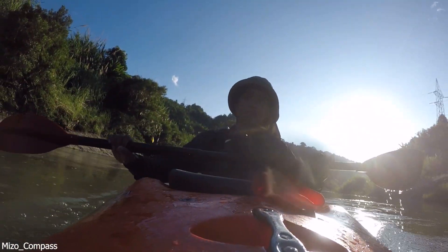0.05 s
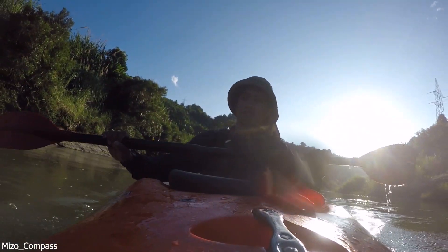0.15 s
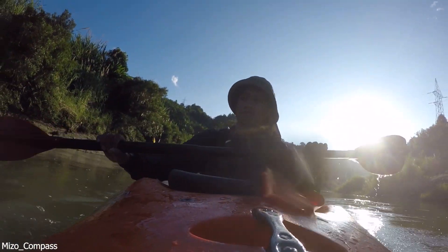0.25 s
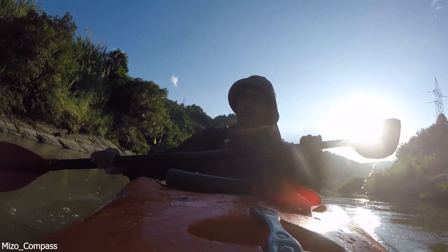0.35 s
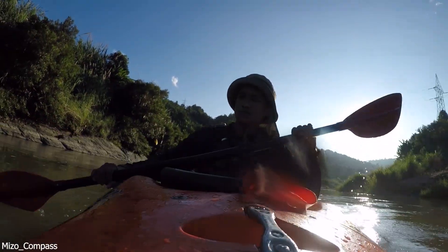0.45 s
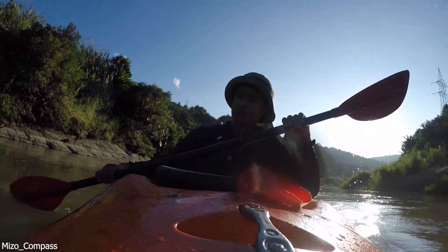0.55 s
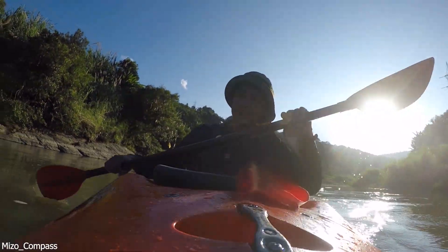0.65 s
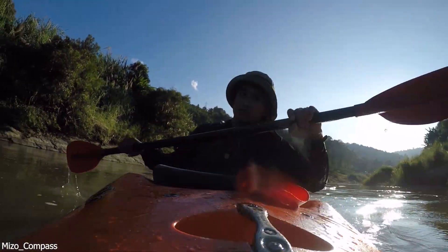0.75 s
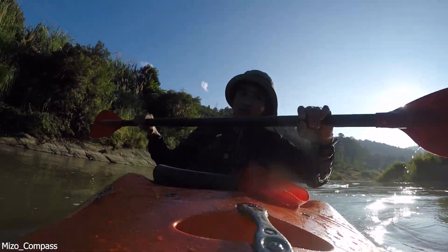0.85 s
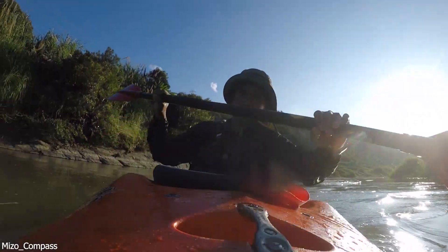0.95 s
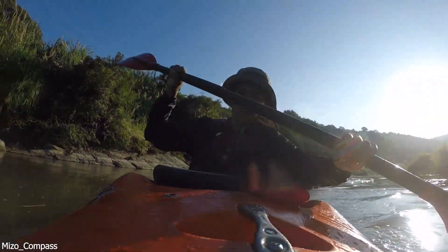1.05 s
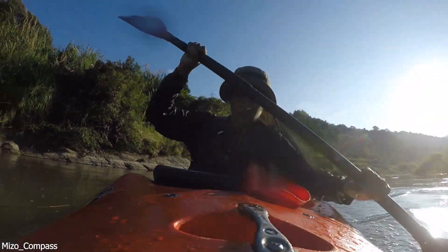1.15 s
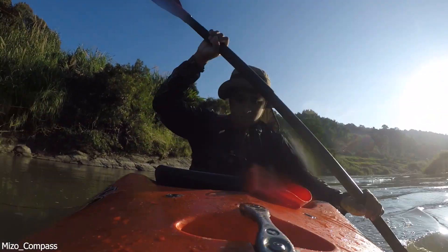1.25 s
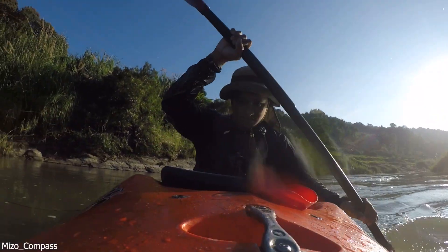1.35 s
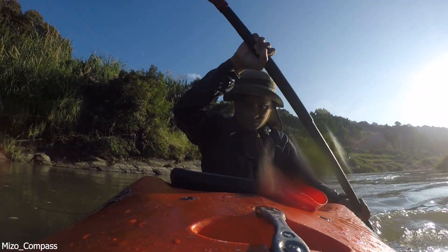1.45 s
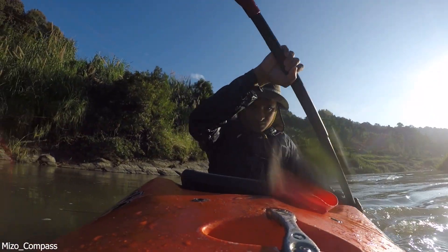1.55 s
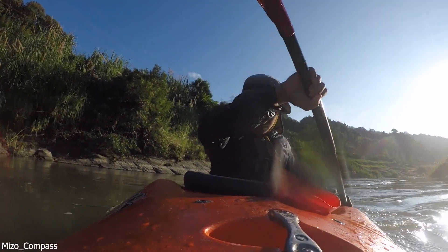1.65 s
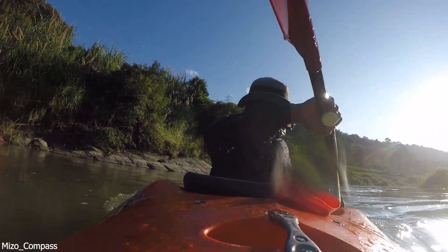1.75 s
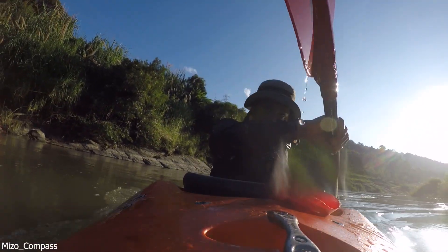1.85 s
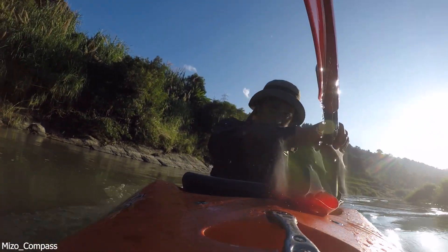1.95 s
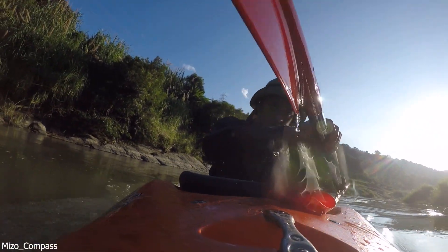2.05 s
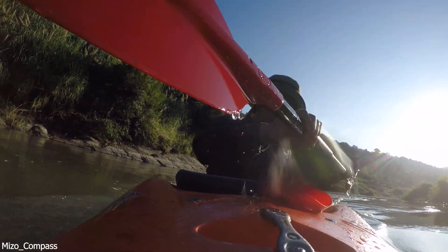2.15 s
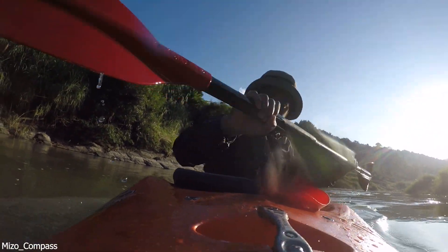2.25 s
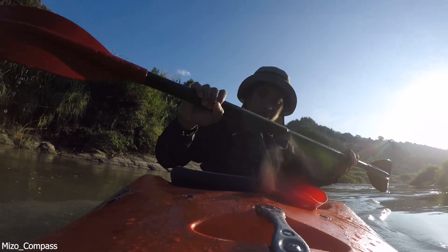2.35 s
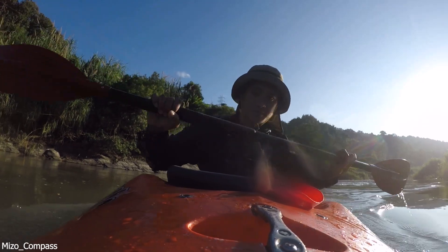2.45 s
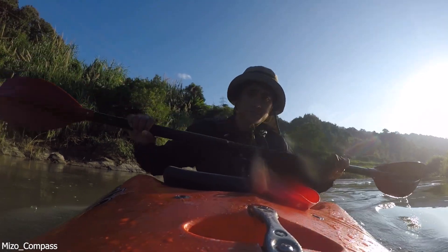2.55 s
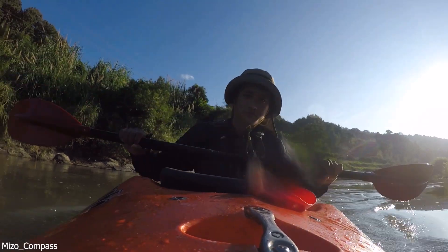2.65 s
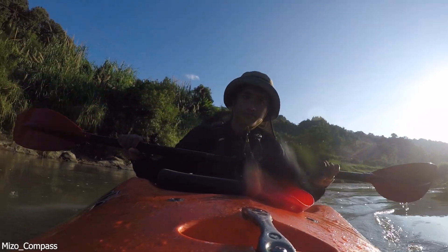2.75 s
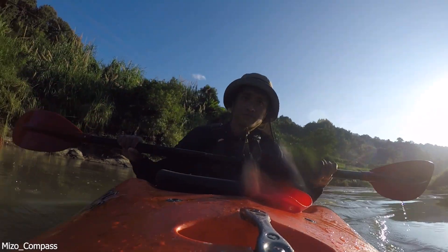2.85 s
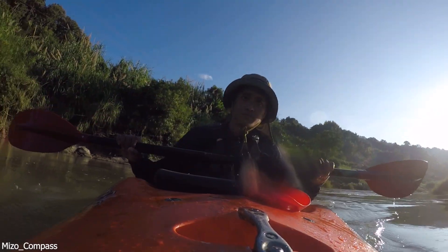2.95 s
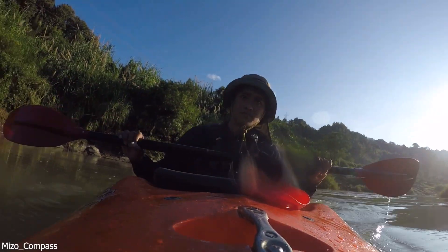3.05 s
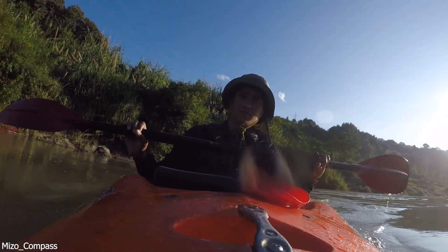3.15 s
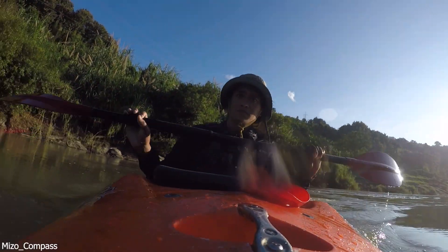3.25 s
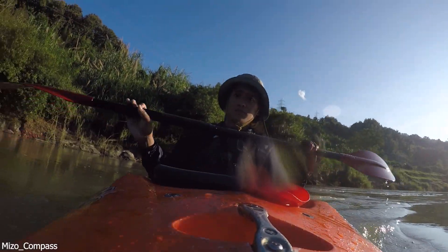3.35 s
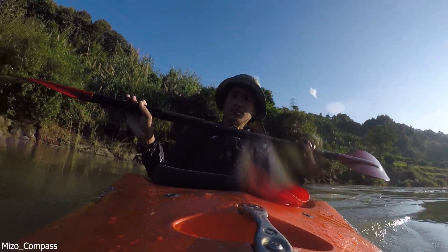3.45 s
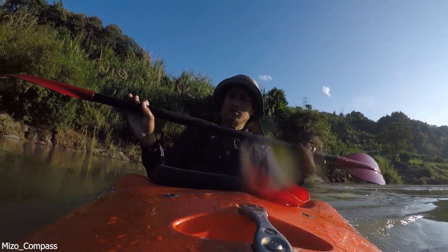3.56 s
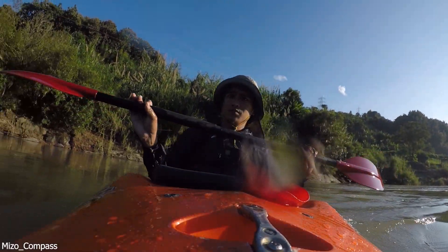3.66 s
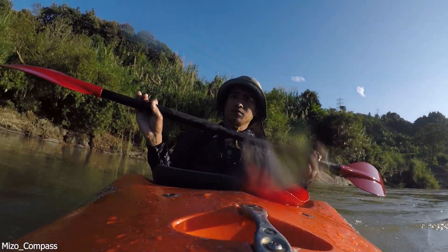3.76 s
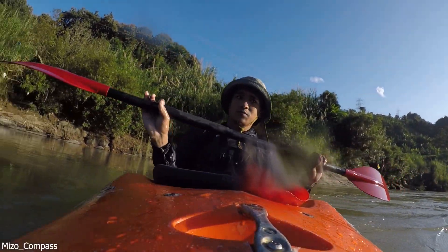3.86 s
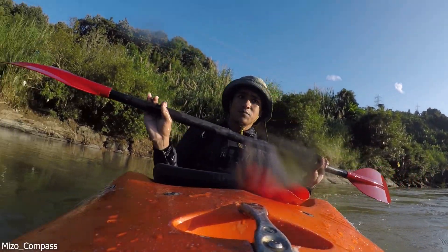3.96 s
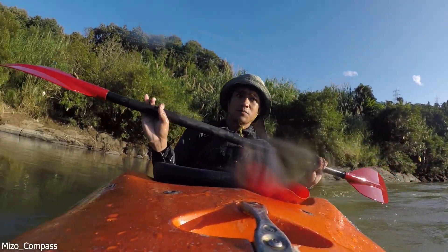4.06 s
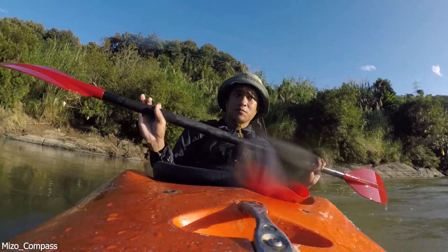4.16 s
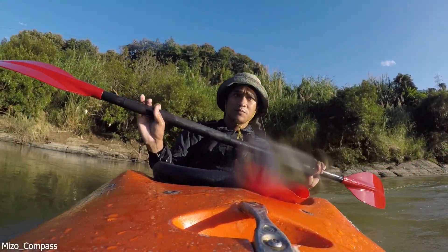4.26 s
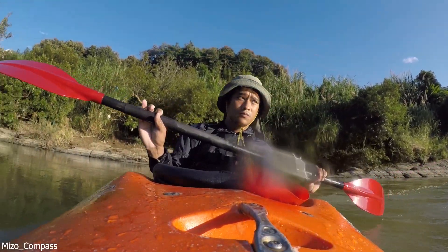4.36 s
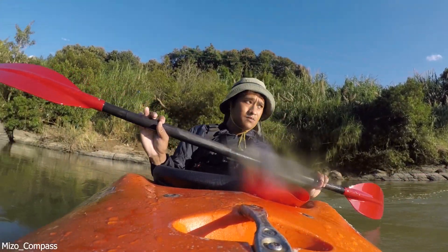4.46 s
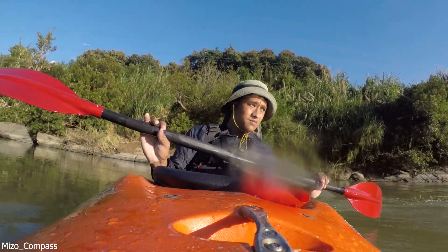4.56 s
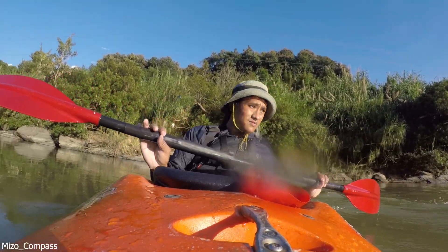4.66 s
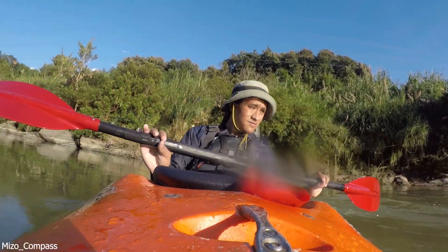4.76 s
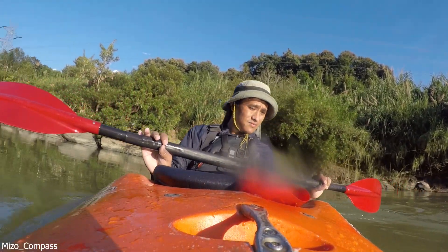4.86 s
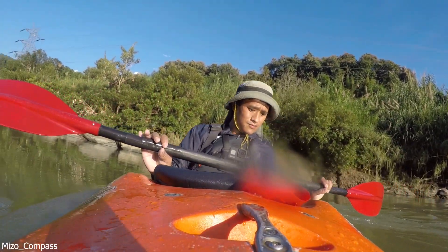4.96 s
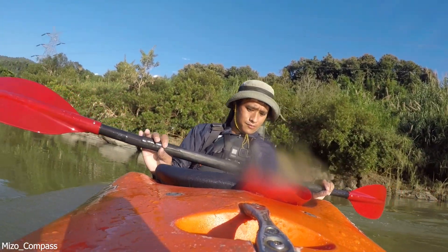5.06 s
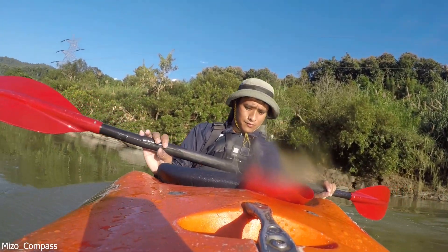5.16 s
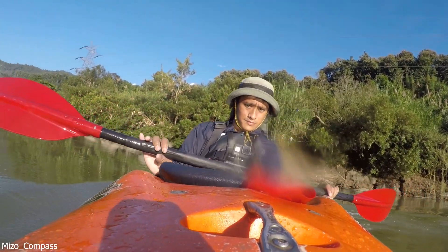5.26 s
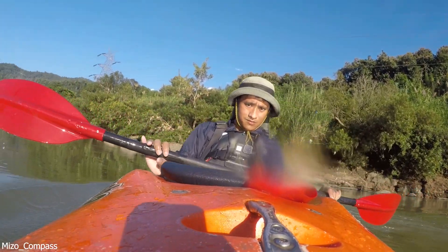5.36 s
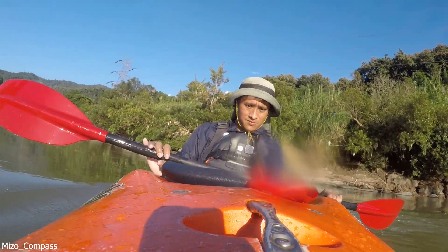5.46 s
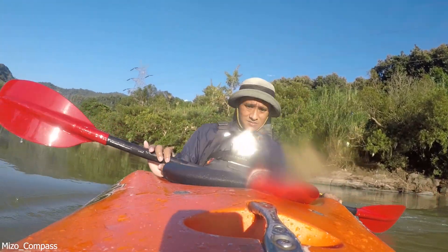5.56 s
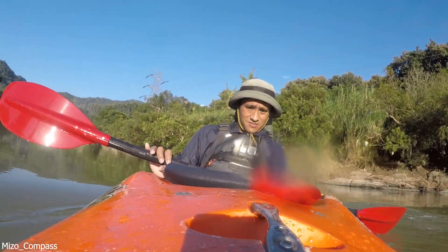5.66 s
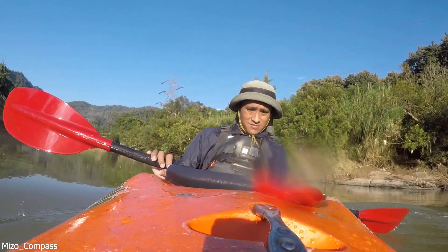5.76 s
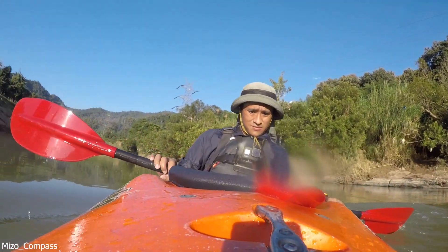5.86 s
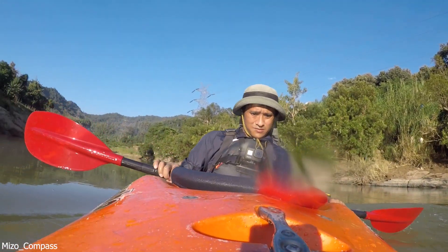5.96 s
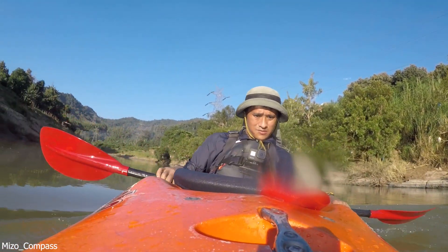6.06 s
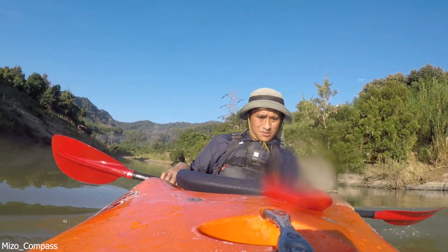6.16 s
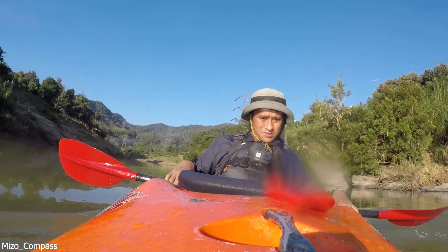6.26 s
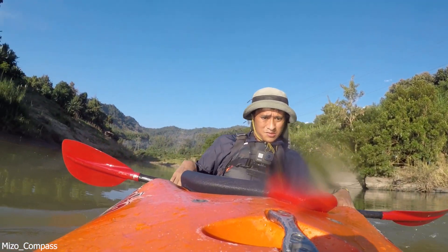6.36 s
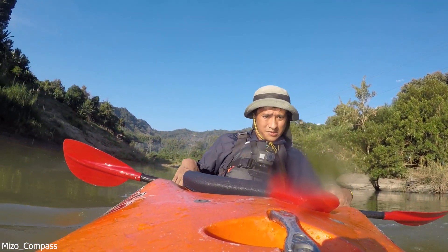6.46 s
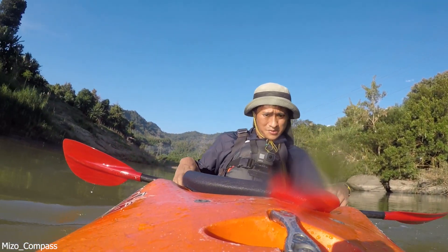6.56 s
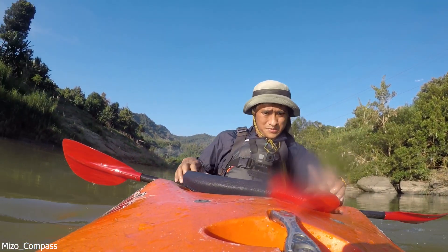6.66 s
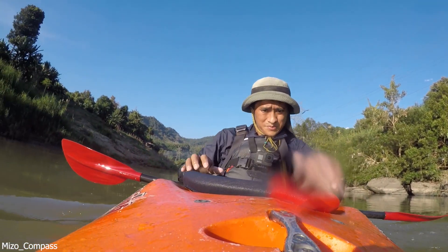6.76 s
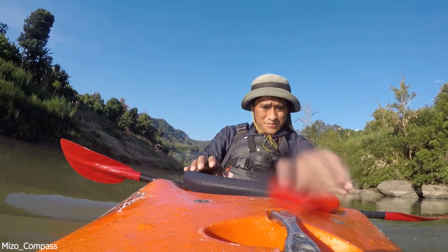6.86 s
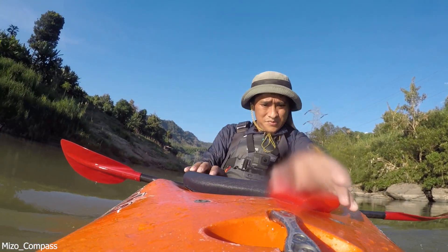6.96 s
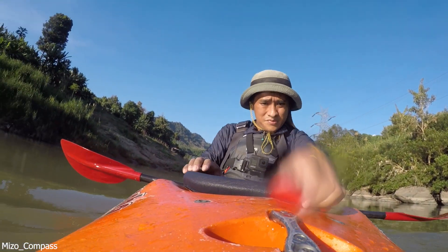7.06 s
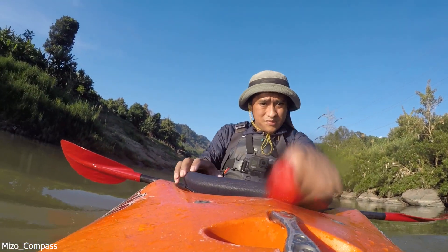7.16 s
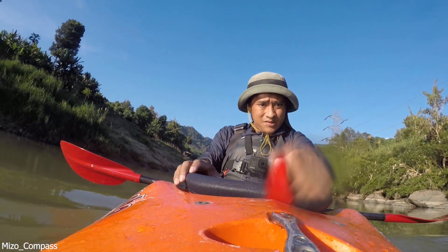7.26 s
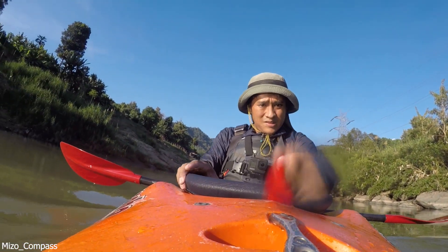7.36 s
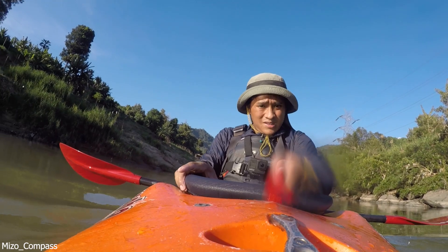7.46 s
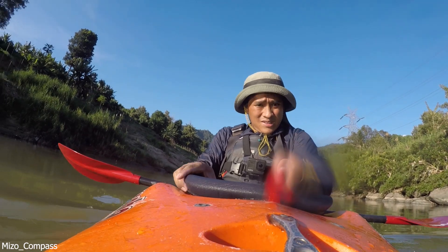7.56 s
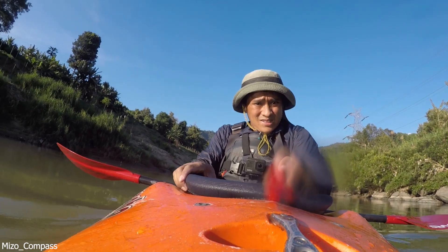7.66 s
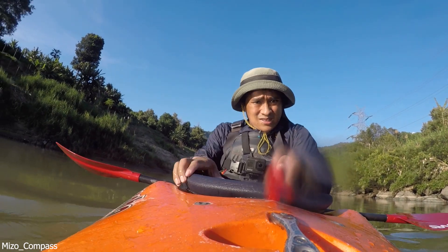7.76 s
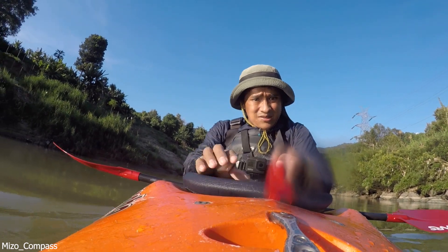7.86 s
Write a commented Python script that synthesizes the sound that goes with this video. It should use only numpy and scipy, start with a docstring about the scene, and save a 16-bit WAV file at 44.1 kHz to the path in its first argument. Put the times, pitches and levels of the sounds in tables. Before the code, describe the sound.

Muffled, boomy water laps and bubbles under a kayak on an open river, with faint airy hiss and small spray ticks. A paddle stroke swells the gurgling and knocks the hollow hull. The flow eases into gliding, with isolated plops and drips, before short squeaks, low judders and heavy hand bumps on the deck and housing end it.

```python
"""Kayak deck, river through the hull

Place: the deck of a plastic kayak, a camera clamped to it with its two microphones right on the hull.
Thrum, boom, gurgle and fizz are ringing bubbles and smooth noise, filtered by hull and housing.
Plops, drips and hollow knocks are decaying tones; shaft and fingers squeak as wavering stick-slip tones.
At the end a hand rubs and knocks deck and camera. Behind it all lie airborne hiss and spray ticks of
filtered noise. The shaken housing drives the two microphones nearly in opposition over much of the range."""
import sys
import numpy as np
from scipy import signal
from scipy.fft import rfft, irfft, next_fast_len
from scipy.io import wavfile
from scipy.ndimage import uniform_filter1d, minimum_filter1d

SR = 44100
rng = np.random.default_rng(int(sys.argv[2]) if len(sys.argv) > 2 else 0)


def bounce(signal):
    """Save signal as a 16-bit WAV file at the path given by the first command-line argument."""
    frames = np.transpose(np.atleast_2d(signal))
    limited = np.clip(frames, -1, 1)
    pcm = np.round(limited * 32767).astype(np.int16)
    wavfile.write(sys.argv[1], SR, pcm)


N = 348831
SIZE = next_fast_len(N + SR // 4)     # transform length, with room for the filters to ring out
HZ = np.maximum(np.fft.rfftfreq(SIZE, 1 / SR), 1)

# Four layers of water against the hull, each: low f/Hz, high f/Hz, nominal bubbles [1/s],
# ringing [cycles], size spread/dB, smooth rush over bubbles/dB
THRUM_LAYER = (27.3, 95.9, 150, 12, 0.38, 3.7)
BOOM_LAYER = (106.5, 450, 703.5, 7, 3, 0.5)
GURGLE_LAYER = (416.5, 1278, 386, 48.5, 3, -1)
FIZZ_LAYER = (1291, 5193, 898, 46.5, 4, -3.5)


def river_on_hull(path, splash_db):
    """Water working on the hull: bubbles and rush in four bands, from low thrum to fizz."""
    layers = (THRUM_LAYER, BOOM_LAYER, GURGLE_LAYER, FIZZ_LAYER)
    return sum(gain * bubbles(path, splash_db, *layer) for gain, layer in zip(layer_gains(), layers))


# Paddle stroke and later the rubbing hand pack the bubbles densely: t/s, density [times as many]
BUBBLE_PACKING = [(0, 1), (1.2, 1), (1.5, 2.1), (3.2, 2.1), (3.5, 1.2), (5, 1.2), (6.85, 1), (7.0, 1.7),
                  (7.91, 1.7)]


def bubbles(path, splash_db, low_hz, high_hz, per_s, cycles, spread_db, rush_db):
    """Clumped bubbles ring as resonances over a smooth rush; the hull carries both to the microphones."""
    packed = in_time(BUBBLE_PACKING)[0]
    clumping = from_db((splash_db + 3.0 * drift(9.0)) / np.sqrt(packed))
    born = rng.random(N) < per_s * packed * clumping / SR
    size_db = spread_db * np.minimum(rng.exponential(1, N), 5)
    sizes = born / np.sqrt(packed) * from_db(size_db)
    clicks = sizes * rng.choice([-1, 1], (2, N))     # two vibration patterns, struck at the same moments

    pitches = np.geomspace(low_hz * 1.045, high_hz / 1.081, 12)
    dealt = rng.integers(0, 12, N)     # which pitch each bubble gets
    tones = 0
    for k, hz in enumerate(pitches):
        swell = [1, 0, -1, *poles(hz, 5.0)]
        ring = [hz ** 3, 0, 0, *poles(hz, cycles)]     # hz cubed: even level per Hz
        tones = tones + signal.sosfilt([swell, ring], clicks * (dealt == k) + 1e-18)

    edges = signal.butter(3, [low_hz, high_hz], "band", fs=SR, output="sos")
    rush_swell = from_db((0.36 * splash_db + 2.05 * drift(10.2)) / packed ** 0.17)
    rush = signal.sosfilt(edges, rng.standard_normal((2, N))) * rush_swell

    mixed = tones / tones.std() + from_db(rush_db) * rush / rush.std()
    shared, own = rfft(mixed, SIZE)
    pair = irfft([shared * path[0], shared * path[1] + own * path[2]], SIZE)[:, :N]
    return mid_rms_one(pair, low_hz, high_hz)


# Water running along the hull: t/s, then level/dB of thrum, boom, gurgle, fizz, before lapping
FLOW_LEVELS = [(0.0, -27, -26.5, -27.5, -34.5), (0.6, -34.5, -37.5, -34, -39.5),
               (1.15, -34.5, -35.5, -38.5, -42.5), (1.4, -33, -26.5, -25, -39),
               (1.75, -26, -29, -27, -32.5), (2.3, -31, -29, -27, -34.5), (2.8, -29.5, -26, -27.5, -36),
               (3.28, -32, -30.5, -27, -40), (3.6, -31, -35.5, -40.5, -46), (4.2, -34.5, -34.5, -40, -43),
               (4.45, -31.5, -26.5, -33.5, -43), (5.0, -40.5, -32, -38, -42), (5.7, -42.5, -31, -39.5, -47),
               (6.3, -33, -31.5, -40.5, -49.5), (6.8, -31.5, -36.5, -49.5, -55),
               (7.4, -30.5, -29.5, -36.5, -57), (7.6, -28, -31.5, -83, -72), (7.91, -37.5, -39.5, -63, -69)]
# Wavelets slapping the hull: t/s, held/s, then level/dB of thrum, boom, gurgle, fizz
WAVELET_SLAPS = [(0.38, 0.082, -43, -32, -29, -40), (0.47, 0.025, -15, -38, -22.5, -36),
                 (0.58, 0.018, -30, -19, -19, -40), (0.69, 0.0071, -14.5, -18, -20, -53),
                 (0.78, 0.012, -26, -31, -16, -33), (1.22, 0.056, -47, -18.5, -22, -49),
                 (1.48, 0.03, -28, -20, -27, -34.5), (1.74, 0.12, -39, -20.5, -28.5, -36),
                 (2.2, 0.068, -29, -26.5, -33.5, -40), (4.11, 0.027, -32, -32.5, -41, -37.5),
                 (3.9, 0.084, -47, -29.5, -33, -47), (4.66, 0.21, -53, -29, -41, -61),
                 (5.02, 0.013, -29, -19, -26, -48)]
# Paddle laid down, then the hand pushing and rubbing on deck and housing: columns as for the slaps
HAND_RUBS = [(5.77, 0.086, -47, -25.5, -35, -44), (5.93, 0.029, -29, -22, -34, -45),
             (6.0, 0.0079, -30, -17.5, -34, -62), (6.07, 0.11, -41, -46, -41.5, -50),
             (6.38, 0.053, -39, -23, -38, -50), (6.49, 0.051, -37, -32, -33.5, -50.5),
             (6.69, 0.076, -26, -35, -63, -76), (6.87, 0.16, -20.5, -29.5, -40, -50),
             (7.0, 0.042, -21, -20, -28, -41), (7.05, 0.052, -23.5, -26.5, -30, -33),
             (7.17, 0.107, -28, -25.5, -35.5, -47), (7.29, 0.061, -18, -23.5, -25, -41.5),
             (7.352, 0.04, -23, -25, -20.5, -44), (7.39, 0.042, -25, -20.5, -45, -63),
             (7.47, 0.06, -43, -52, -46.5, -65), (7.565, 0.011, -34, -18, -32.5, -53.5),
             (7.61, 0.036, -42, -29.5, -49, -73), (7.66, 0.041, -32, -25, -36.5, -65),
             (7.735, 0.048, -32, -32, -41, -43)]
SLAP_ATTACK_S, SLAP_T60_S = 0.024, 0.067
RUB_ATTACK_S, RUB_T60_S = 0.014, 0.044
# Boom, gurgle and fizz also swell and sink by chance, thrum stays steady:
# spread of thrum, boom, gurgle, fizz [dB], and rate [Hz]
LAPPING_DB, LAPPING_HZ = [[0], [2], [1], [2]], 1.07


def layer_gains():
    """Flow, slaps and rubs add up as power in each layer."""
    lapping_db = LAPPING_DB * np.array([drift(LAPPING_HZ) for _ in LAPPING_DB])
    flow = from_db(np.array(in_time(FLOW_LEVELS)) + lapping_db)
    slaps = bursts(WAVELET_SLAPS, SLAP_ATTACK_S, SLAP_T60_S)
    rubs = bursts(HAND_RUBS, RUB_ATTACK_S, RUB_T60_S)
    return np.sqrt(flow ** 2 + slaps + rubs)


def bursts(events, attack_s, t60_s):
    """Power of each layer: every event rises, holds and dies away."""
    t, power = np.arange(N) / SR, 0
    for start_s, held_s, *layers_db in events:
        rise = np.clip((t - start_s) / attack_s, 0, 1)
        decay = from_db(-60 * np.maximum(t - start_s - held_s, 0) / t60_s)     # held_s counts from the start
        power = power + np.outer(from_db(layers_db), rise * decay) ** 2
    return power


# Bubbles exciting the cockpit cavity: low f/Hz, high f/Hz, nominal bubbles [1/s],
# ringing [cycles], size spread/dB, smooth rush over bubbles/dB
CAVITY_LAYER = (280.5, 484.5, 250, 42, 1, -3.5)
# Hum while the boat is driven through the water: t/s, level/dB
CAVITY_LEVEL = [(0, -32), (.5, -37), (1.15, -67), (1.45, -34.5), (1.85, -26), (2.4, -27.5), (2.75, -26.5),
                (3.3, -30.5), (3.55, -42.5), (7.91, -65)]


def cockpit_hum(path, splash_db):
    """The cockpit cavity hums in a narrow band while the boat is driven through the water."""
    return from_db(in_time(CAVITY_LEVEL)[0]) * bubbles(path, splash_db, *CAVITY_LAYER)


# Single large bubbles against the hull: t/s, nominal peak level/dB, starting f/Hz, decay by 60 dB [cycles]
LARGE_BUBBLES = [(0.05, -21, 540, 47), (0.146, -13, 590, 11), (0.292, -26, 880, 27), (0.31, -33, 484, 80),
                 (0.398, -11, 496, 8.3), (0.425, -26, 815, 44), (0.465, -19.5, 780, 71),
                 (0.507, -15, 812, 64), (0.562, -14.5, 615, 3.9), (0.692, -23, 690, 17),
                 (0.748, -22.5, 806, 32), (0.783, -14.5, 720, 29), (0.851, -20, 940, 36),
                 (0.868, -15, 935, 22), (0.927, -20.5, 1230, 20), (1.026, -22, 870, 20),
                 (1.052, -17, 990, 27), (1.081, -19, 1020, 29), (1.174, -26.5, 955, 120),
                 (1.219, -14.5, 770, 31), (1.258, -12, 680, 10), (1.368, -13.5, 834, 47),
                 (1.487, -10, 497, 29), (2.902, -27, 804, 36), (3.072, -18, 900, 36),
                 (3.422, -24, 797, 120), (3.475, -23, 890, 130), (3.574, -15, 810, 27),
                 (3.5795, -16, 935, 23), (4.69, -27, 750, 47), (4.907, -22, 1000, 25),
                 (4.995, -25, 1150, 35), (5.026, -19, 540, 19), (5.057, -26, 1150, 26),
                 (5.157, -22, 1044, 77), (5.277, -30.5, 1195, 63), (5.555, -20, 677, 26),
                 (5.936, -18.5, 486, 25), (6.393, -22, 497, 50), (6.834, -31, 660, 86),
                 (7.05, -20.5, 682, 47), (7.225, -26, 667, 78), (7.299, -20, 875, 35),
                 (7.355, -17, 950, 26), (7.712, -36, 1060, 90), (7.755, -26.5, 1204, 51)]


def plops():
    """Large bubbles ring down right against the hull."""
    return rings(LARGE_BUBBLES, rise=0.0012, swell_cycles=0.39, companion_db=-12.5)


# Drips plinking on deck and water, at the end fingertips snapping on wet plastic:
# t/s, nominal peak level/dB, starting f/Hz, decay by 60 dB [cycles]
DRIPS_AND_SNAPS = [(0.0438, -21.5, 2000, 59), (0.08, -30, 2380, 46), (0.2229, -20, 2010, 47),
                   (0.353, -17.5, 1690, 41), (0.365, -23.5, 2190, 52), (0.475, -29.5, 3670, 30),
                   (0.5026, -25.5, 2100, 63), (0.554, -27.5, 2360, 49), (0.595, -27, 2050, 36),
                   (0.6465, -11.5, 2640, 25), (0.773, -24.5, 2090, 25), (0.927, -21, 2130, 40),
                   (0.948, -23.5, 1630, 52), (0.949, -29, 2700, 57), (1.004, -26, 1610, 41),
                   (1.027, -22.5, 2240, 56), (1.06, -22, 1910, 35), (1.082, -27.5, 2580, 45),
                   (1.4414, -21.5, 1518, 28), (1.5623, -22, 2150, 86), (1.6921, -20.5, 2240, 55),
                   (1.8688, -21, 2030, 40), (1.9709, -16, 1996, 29), (2.135, -18.5, 1410, 34),
                   (2.143, -26, 2030, 38), (2.291, -18, 2020, 48), (2.3925, -20.5, 2070, 40),
                   (2.4355, -23, 2340, 40), (2.623, -27.5, 3780, 60), (2.985, -27, 2020, 45),
                   (3.0851, -18.5, 1630, 29), (3.137, -26.5, 1990, 70), (3.202, -24.5, 2100, 55),
                   (3.272, -27, 2340, 41), (3.55, -26.5, 2000, 34), (3.6522, -20, 1960, 32),
                   (3.8, -28, 2100, 40), (4.107, -29.5, 1640, 56), (4.303, -27.5, 2310, 40),
                   (4.329, -25.5, 1640, 46), (4.557, -26, 2030, 72), (4.622, -30, 1580, 77),
                   (4.726, -28, 2060, 77), (4.791, -24, 1560, 51), (4.902, -21, 1596, 57),
                   (5.02, -26, 2580, 66), (5.0459, -26, 1630, 67), (5.146, -28.5, 2020, 69),
                   (5.183, -26, 1600, 50), (5.493, -21, 1586, 57), (6.066, -37, 3580, 40),
                   (6.312, -35, 1950, 39), (6.319, -37.5, 3280, 24), (6.361, -32, 2030, 42),
                   (7.0688, -13.5, 2440, 45), (7.101, -35, 2300, 12), (7.197, -27, 1480, 14),
                   (7.343, -42, 2300, 8), (7.358, -31, 1900, 8), (7.401, -41, 2190, 10)]


def drips():
    """Drips and fingertip snaps ring higher, with a slower swell and louder answering modes."""
    return rings(DRIPS_AND_SNAPS, rise=0.00089, swell_cycles=1.1, companion_db=-8)


# Hollow knocks of the hull: t/s, nominal peak level/dB, starting f/Hz, decay by 60 dB [cycles]
HULL_KNOCKS = [(0.005, -16.5, 345, 44), (0.59, -20, 52, 20), (1.247, -17, 352, 14), (1.99, -20, 55, 15),
               (1.75, -3.5, 357, 9.3), (1.82, -11.5, 347, 19), (2.149, -20, 340, 52),
               (2.203, -13.5, 333.7, 61), (2.551, -14, 327, 22), (2.7, -20, 344, 37),
               (2.735, -15, 345.5, 85), (2.815, -7.5, 310, 19), (3.03, -22, 337, 56),
               (4.138, -16.5, 295, 3.4), (4.422, -12, 304, 3.5), (4.501, -16, 257, 5.5),
               (5.37, -22.5, 202.3, 114), (5.777, -17, 236, 9.5), (5.829, -18, 349, 45),
               (6.09, -15, 55.8, 26), (6.395, -18, 150, 27), (6.699, -19, 180, 14), (6.885, -18, 90.5, 3.9),
               (6.93, -15, 48.8, 15), (7.016, -7, 117, 7.4), (7.362, -10.5, 260, 26),
               (7.421, -9.5, 74, 2.6), (7.572, -14.5, 227, 4), (7.615, -19, 225, 5.5),
               (7.775, -26, 364, 23)]


def knocks():
    """The hollow hull rings low when knocked, with a quick onset."""
    return rings(HULL_KNOCKS, rise=0.00035, swell_cycles=0.23, companion_db=-15.5)


WOBBLE_DB, WOBBLE_HZ = 2, 150.0     # no blow rings evenly


def rings(events, rise, swell_cycles, companion_db):
    """Each blow swells and rings down, rising in pitch; two nearby modes of the hull answer it."""
    out, draws = np.zeros((2, N)), rng.random((len(events), 2, 3))
    for (s, peak_db, hz, cycles), chance in zip(events, draws):
        voices = [(s, peak_db, hz)]
        for late, weak, tune in chance:
            mode_hz = hull_mode(hz * 2 ** (1.5 * tune - .9), hz)
            voices.append((s + 5.96 * late / hz, peak_db + companion_db - 8.1 * weak, mode_hz))
        for begin, db, pitch_hz in voices:
            start = round(begin * SR)
            length = min(N - start, round(cycles * SR / pitch_hz))
            turns = np.arange(length) * pitch_hz / SR
            soft_start = (1 - np.exp(-turns / swell_cycles)) ** 3     # no click
            shape = soft_start * from_db(-60 * turns / cycles)
            shape *= from_db(db) / shape.max()
            phase = 2 * np.pi * turns * (1 + rise * turns)
            out[:, start:start + length] += shape * tone_pair(phase, pitch_hz)
    return out * from_db(WOBBLE_DB * drift(WOBBLE_HZ))


# Where hull and housing ring most readily: f/Hz
RINGING_MODES_HZ = np.array([52, 110, 190, 340, 500, 670, 830, 1000, 1200, 1600, 2050, 2550])


def hull_mode(hz, struck_hz):
    """The mode nearest to a pitch, leaving out any close to the struck pitch."""
    others = RINGING_MODES_HZ[abs(np.log(RINGING_MODES_HZ / struck_hz)) > .15]
    return others[np.argmin(abs(np.log(others / hz)))]


# Shaft, then fingers, slipping on wet plastic, from squeaks down to low judders; one list per slip:
# t/s, mean f/Hz, nominal level/dB, nominal octave level/dB
WET_SLIPS = [
    [(5.87, 1206, -36, -69), (5.92, 1350, -42, -67), (5.934, 1244, -25.5, -52), (5.958, 1094, -27, -53),
     (5.992, 1350, -31.5, -85), (6.01, 1061, -46, -76)],
    [(6.09, 1200, -26, -37), (6.107, 1236, -19, -38), (6.12, 1300, -30, -42), (6.132, 1310, -29, -46),
     (6.145, 1339, -46, -73)],
    [(6.15, 1310, -42, -67), (6.158, 1294, -35, -52), (6.176, 1163, -27, -42), (6.194, 1170, -25.5, -44),
     (6.204, 1240, -28, -64), (6.215, 1339, -35, -72)],
    [(6.95, 860, -43, -65), (6.985, 867, -39, -68), (6.998, 896, -28, -59), (7.01, 875, -27, -75),
     (7.015, 876, -46, -62)],
    [(6.993, 1395, -36, -72), (7.007, 1420, -25.5, -86), (7.013, 1360, -29, -62), (7.021, 1200, -28, -59),
     (7.03, 1291, -45, -72)],
    [(6.381, 1950, -27, -62), (6.387, 1480, -26, -56), (6.396, 800, -36, -62)],
    [(6.489, 1550, -30, -62), (6.498, 830, -32, -62)],
    [(6.5, 1250, -27, -62), (6.512, 613, -35, -62)],
    [(6.203, 570, -43, -43), (6.217, 531, -24.5, -65), (6.24, 522, -34.5, -54), (6.27, 600, -43, -42)],
    [(7.185, 48.7, -28, -17), (7.22, 46.7, -20, -28), (7.26, 45.4, -25, -38), (7.29, 48, -28, -32)],
    [(7.66, 204, -14, -30), (7.672, 189, -18, -32), (7.7, 182, -10.5, -36), (7.715, 182, -24, -42),
     (7.728, 187, -19, -47)],
    [(7.758, 167, -28, -31), (7.772, 180, -20, -35), (7.79, 185, -21, -31), (7.805, 201, -21, -38),
     (7.825, 205, -31, -60)],
]


def squeaks():
    """Fast regular stick-slip: a wavering tone with two overtones."""
    out, t = np.zeros((2, N)), np.arange(N) / SR
    for rows in WET_SLIPS:
        on = (t > rows[0][0]) & (t < rows[-1][0])
        hz, level_db, octave_db = (c[on] for c in in_time(rows))
        grip = signal.windows.tukey(len(hz), .3) * from_db(2.8 * drift(140.0)[on])
        phase = 2 * np.pi * np.cumsum(hz * (1 + 0.016 * drift(170.0)[on])) / SR
        for harmonic, db in ((1, level_db), (2, octave_db), (3, octave_db - 20)):
            tone = tone_pair(harmonic * phase, harmonic * hz.mean())
            out[:, on] += np.sqrt(2) * grip * from_db(db) * tone     # root 2: levels are rms
    return out


# Airborne hiss, swelling with the paddle stroke, sinking while the camera is handled: t/s, level/dB
HISS_LEVEL = [(0.0, -60.5), (1.05, -58.5), (1.2, -54), (1.67, -58.5), (2.6, -56), (3.1, -60), (5.7, -59),
              (7.03, -58), (7.16, -63.5), (7.35, -66), (7.4, -73), (7.46, -71.5), (7.91, -73.5)]


def hiss(ports):
    """Faint flickering noise through the sound ports, unrelated in the two microphones."""
    noise = rng.standard_normal((2, N)) * from_db(1.35 * drift(30.0))
    coloured = irfft(rfft(noise, SIZE) * ports, SIZE)[:, :N]
    return from_db(in_time(HISS_LEVEL)[0]) * mid_rms_one(coloured, 5500, 11000)


# Spray and fingertips hitting the housing: t/s, strike level/dB before noise and ports
HOUSING_TICKS = [(0.394, -44), (0.666, -46), (1.094, -38), (1.111, -39), (1.181, -34), (1.224, -40),
                 (1.3204, -40), (1.6395, -43), (2.499, -33.5), (2.5124, -37), (2.803, -34), (3.1633, -37.5),
                 (7.069, -42), (7.234, -47)]


def ticks(ports):
    """Each hit on the housing is a short decaying burst of noise, coloured by the sound ports."""
    blows = np.full(N, 1e-18)
    for s, strike_db in HOUSING_TICKS:
        blows[round(s * SR)] = from_db(strike_db)
    decay = signal.lfilter([1], [1, -from_db(-60 / (0.028 * SR))], blows)     # 60 dB in 28 ms
    puffs = decay * rng.standard_normal((2, N))
    return irfft(rfft(puffs, SIZE) * ports, SIZE)[:, :N] / np.sqrt(np.mean(abs(ports) ** 2))


# Colour of the sound ports in front of the microphones: f/Hz, relative left level/dB, relative right level/dB
PORT_COLOUR = [(2470, -10, -18), (3320, -8, 1.5), (3400, -13.5, -17), (4700, -14.5, -9.5),
               (4740, -12.5, -15.5), (6300, -8.5, -5.5), (6600, 0.5, -9), (6940, -0.5, 0),
               (7370, -6.5, 3.5), (7960, -7.5, -11.5), (9000, -17, -5.5), (10380, -13.5, -15),
               (11600, -28, -21), (12300, -13.5, -19), (13300, -57, -27.5)]


def sound_ports():
    """Responses of the left and right sound port to airborne sound."""
    return np.array([causal(db) for db in at_hz(PORT_COLOUR, HZ)])


# Colour of hull and housing: f/Hz, relative level/dB
HULL_COLOUR = [(25, -33), (40, -6.5), (52, -2), (66, -3), (120, 1), (190, 3.5), (255, -4.5), (340, -2.5),
               (500, -9.5), (680, -11), (830, -7.5), (1050, -10.5), (1380, -14), (1610, -14.5),
               (1850, -18.5), (2050, -13.5), (2250, -19), (2650, -31), (3050, -37.5), (3800, -40),
               (4700, -46.5), (6500, -76.5)]


def hull_path():
    """Responses: shared motion to left, shared motion to right, separate motion to right."""
    balance_db, phase, alike = at_hz(HOUSING_PAIR, HZ)
    left = causal(at_hz(HULL_COLOUR, HZ)[0] + balance_db / 2)
    right = left * from_db(-balance_db) * np.exp(1j * phase)
    return left, right * alike, right * np.sqrt(1 - alike ** 2)


# How the shaken housing reaches the two microphones, for single tones here and for hull_path:
# f/Hz, left over right level/dB, right phase [rad], likeness [0-1]
HOUSING_PAIR = [(30, -3.5, 5.9, 0.54), (52, -9.0, 4.4, 0.63), (80, 2.4, 3.0, 0.76), (130, 4.1, 2.9, 0.86),
                (200, 10.9, 3.1, 0.89), (260, 5.1, 3.0, 0.83), (340, -1.3, 2.4, 0.2), (430, 2.0, 3.6, 0.85),
                (500, 7.8, 3.1, 0.59), (800, 4.0, 2.5, 0.85), (1150, 2.2, 2.9, 0.88),
                (1550, 3.5, 2.3, 0.94), (2050, -0.8, 2.4, 0.99), (2700, -0.8, 1.7, 0.81),
                (3100, -2.5, 1.5, 0.42), (3500, -0.7, 1.5, 0.38), (3850, 1.1, 0.2, 0.71),
                (4700, 8.5, 2.1, 0.41)]


def tone_pair(phase, hz):
    """A tone as both microphones get it from the hull; the mean of the pair has height 1."""
    balance_db, turn, alike = at_hz(HOUSING_PAIR, hz)
    left = from_db(balance_db)
    shared = alike * np.exp(1j * turn)
    chance = np.angle(left + shared) + rng.choice([-1, 1]) * np.pi / 2     # unlike part, a quarter turn away
    right = shared + np.sqrt(1 - alike ** 2) * np.exp(1j * chance)
    return np.imag(np.outer([left, right], np.exp(1j * phase))) * 2 / abs(left + right)


def poles(hz, cycles):
    """Denominator of a resonance whose poles decay by 60 dB in the given cycles."""
    r = from_db(-60 * hz / (cycles * SR))
    return [1, -2 * r * np.cos(2 * np.pi * hz / SR), r * r]


def causal(db):
    """Minimum-phase response of a level spectrum: nothing sounds early."""
    cepstrum = irfft(np.log(from_db(db)), SIZE)
    cepstrum[1:SIZE // 2] *= 2
    cepstrum[SIZE // 2 + 1:] = 0
    return np.exp(rfft(cepstrum))


def drift(rate_hz):
    """Slow random wander of spread 1: noise smoothed at every 40th sample, then interpolated."""
    r = np.exp(-80 * np.pi * rate_hz / SR)
    slow = signal.lfilter([1], [1, -2 * r, r * r], rng.standard_normal(N // 40 + 2002))[2000:]
    return np.interp(np.arange(N) / 40, np.arange(len(slow)), slow / slow.std())


def mid_rms_one(x, low_hz, high_hz):
    """Scale a pair so that its mean has rms 1 inside the band."""
    band = signal.butter(4, [low_hz, high_hz], "band", fs=SR, output="sos")
    mid = signal.sosfilt(band, x.mean(axis=0))
    return x / np.sqrt(np.mean(mid ** 2))


def in_time(rows):
    """Columns of a curve at every sample."""
    s, *columns = np.transpose(rows)
    return [np.interp(np.arange(N) / SR, s, c) for c in columns]


def at_hz(rows, hz):
    """Columns of a spectrum table at given frequencies, interpolated over log frequency."""
    centres, *columns = np.transpose(rows)
    return [np.interp(np.log(hz), np.log(centres), c) for c in columns]


def from_db(db):
    """Gain of a level."""
    return 10 ** (np.asarray(db) / 20)


def scene():
    """Hull-borne water, blows and squeaks, with airborne hiss and ticks behind."""
    path, ports = hull_path(), sound_ports()
    splash_db = 3.7 * drift(26.0)     # one splash frees bubbles of every size
    water = river_on_hull(path, splash_db) + cockpit_hum(path, splash_db)
    blows = plops() + drips() + knocks()
    return water + blows + squeaks() + hiss(ports) + ticks(ports)


CEILING, CUTOFF_HZ = .93, 13800     # limiter ceiling [full scale], top of the microphones' band


def record(dry):
    """A look-ahead limiter holds the peaks, then a steep low-pass cuts the top."""
    room_left = np.minimum(1, CEILING / (abs(dry).max(axis=0) + 1e-9))
    gain = uniform_filter1d(minimum_filter1d(room_left, size=1201), size=601)
    return signal.sosfilt(signal.cheby2(12, 70, CUTOFF_HZ, fs=SR, output="sos"), dry * gain)


dry = scene()
out = record(dry)
bounce(out)
```